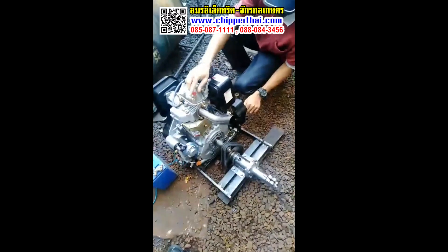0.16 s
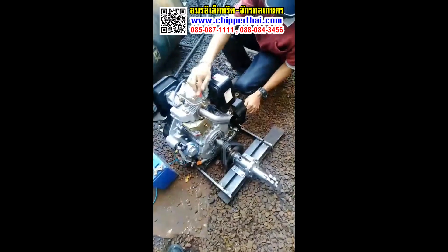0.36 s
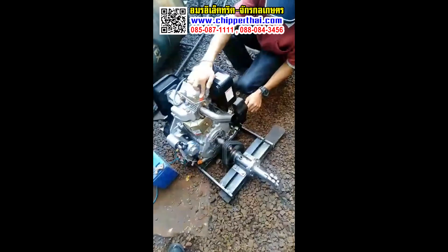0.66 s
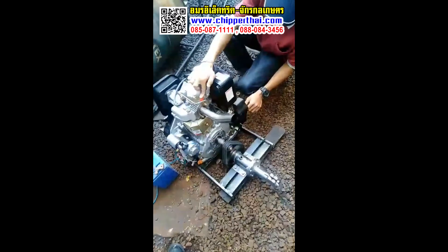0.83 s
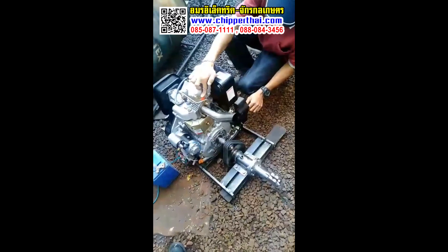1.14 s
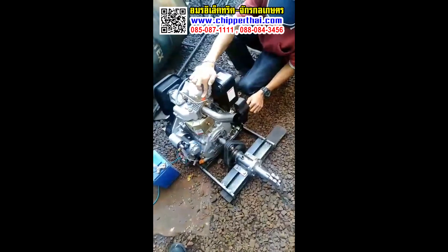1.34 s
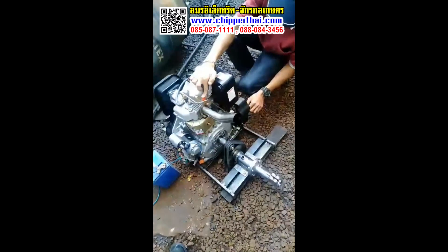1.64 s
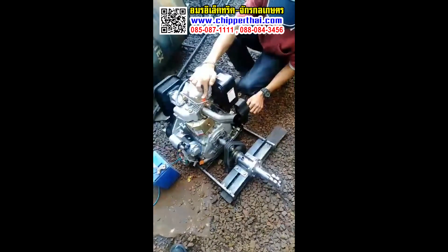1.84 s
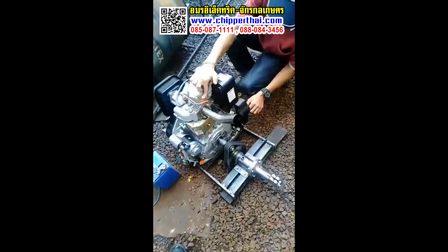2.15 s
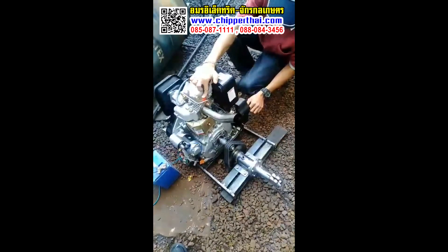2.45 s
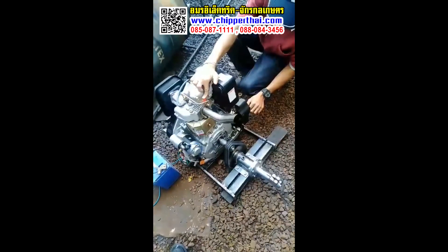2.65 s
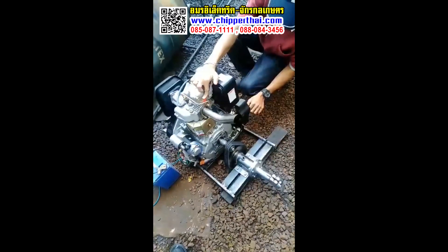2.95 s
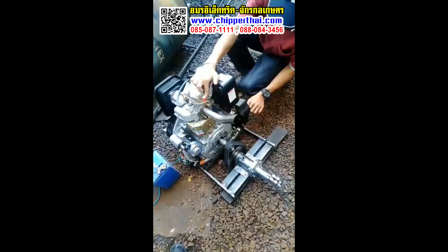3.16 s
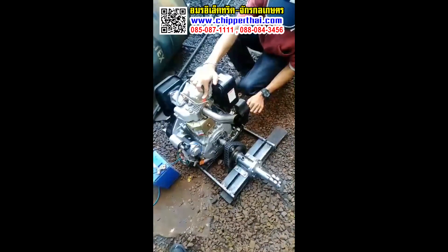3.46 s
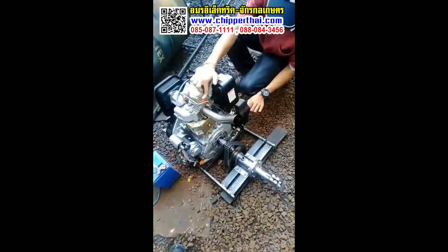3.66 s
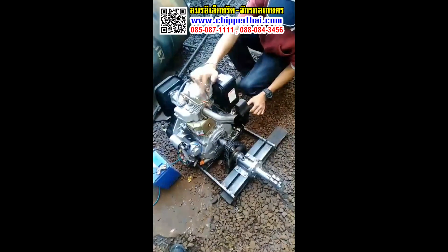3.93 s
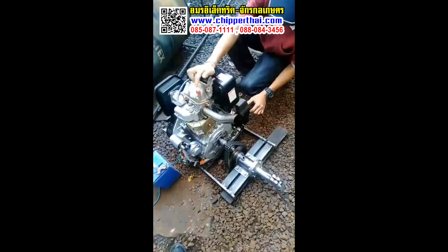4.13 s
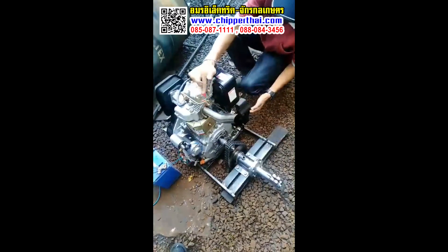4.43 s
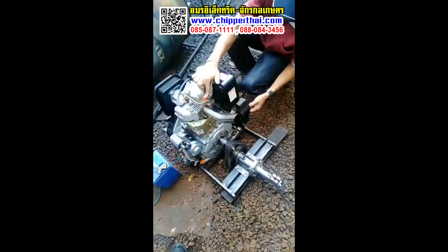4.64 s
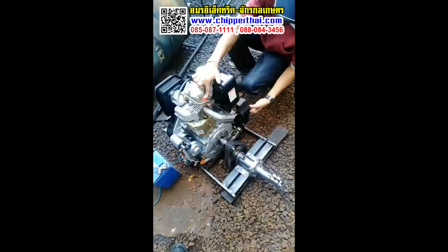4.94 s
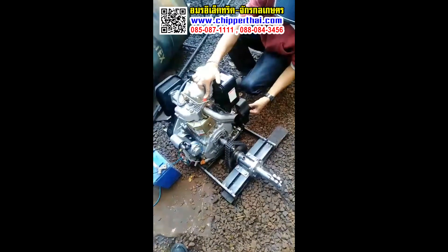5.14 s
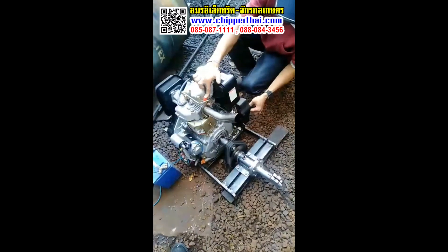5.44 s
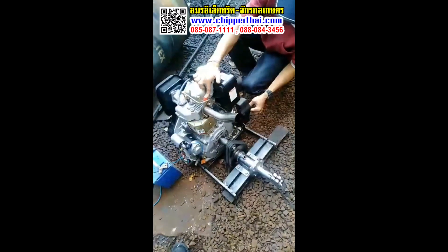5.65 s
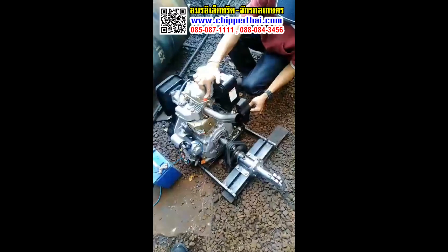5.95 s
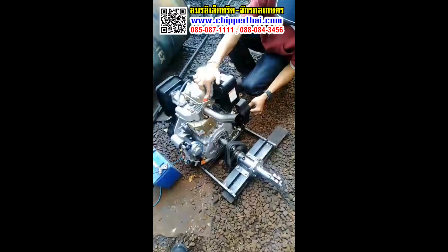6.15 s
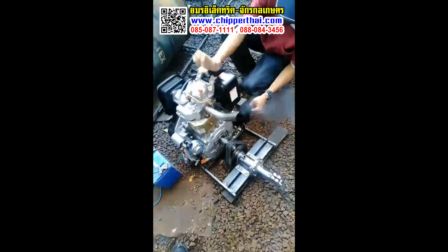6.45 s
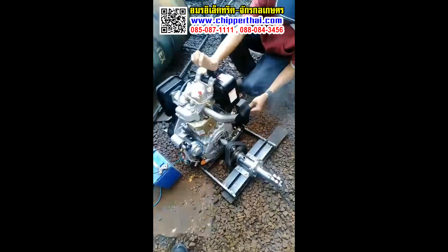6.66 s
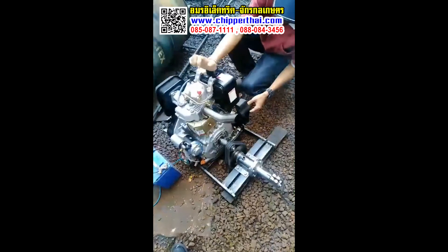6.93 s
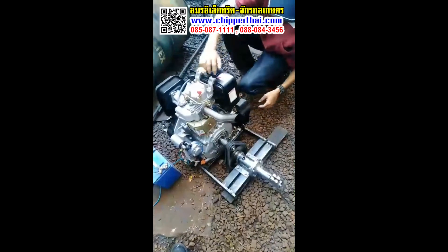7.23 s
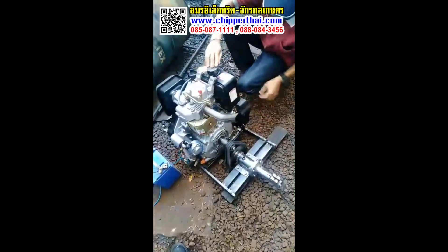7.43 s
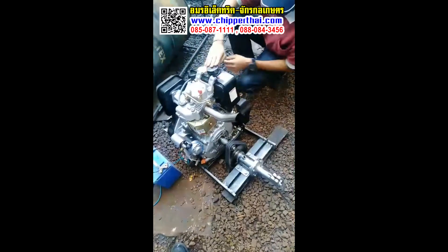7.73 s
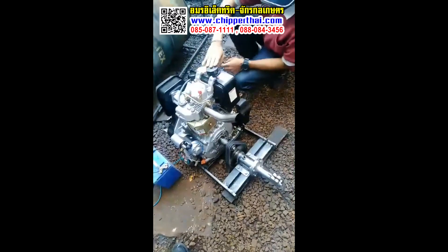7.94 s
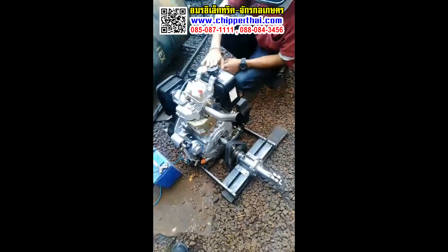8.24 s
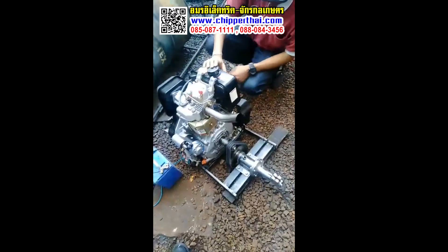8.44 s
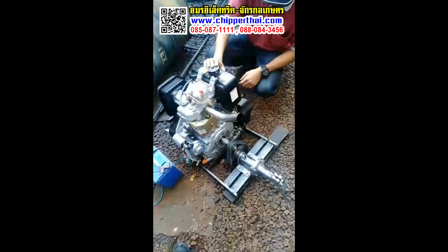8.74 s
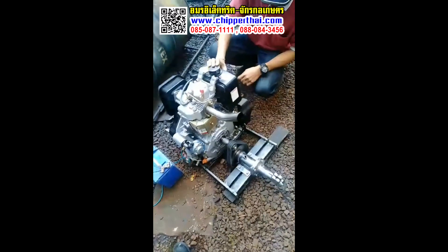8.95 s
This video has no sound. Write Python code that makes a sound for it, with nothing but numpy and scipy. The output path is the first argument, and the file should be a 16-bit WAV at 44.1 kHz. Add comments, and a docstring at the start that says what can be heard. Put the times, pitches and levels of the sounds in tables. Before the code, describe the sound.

Outdoors, close to a small single-cylinder diesel: quick knocking chugs for an instant, then a clack and firing stops. Air hisses on each turn, slowing and weakening with rattling metal, ending in a sigh and thin whistle. Quiet low rumble with faint squeaks and ticks. Then a starter slams and grinds harshly, the flywheel rings, and the engine coughs, catches and idles steadily.

```python
"""A small single-cylinder diesel idles outdoors, then hisses on each compression and clacks to a halt.
After a rest the starter grinds, the flywheel rings, and the engine coughs, catches and idles again.
A held decompression lever lets the compressions hiss away; the starter cranks until it is let go.
Crank angle times the gas pulses, knocks, clacks and air jets: pulses, shaped noise, damped resonances.
Gear mesh sets the starter's whine and grit; levels in dB are relative, before each layer's mix gain."""
import sys
import numpy as np
from scipy import signal
from scipy.fft import rfft, irfft, next_fast_len
from scipy.io import wavfile
from scipy.ndimage import uniform_filter1d

SR = 44100
rng = np.random.default_rng(int(sys.argv[2]) if len(sys.argv) > 2 else 0)


def unload_audio(sound):
    """Save the sound as a 16-bit wav file, at the path given as the first command line argument."""
    columns = np.transpose(np.atleast_2d(sound))
    # keep every value between -1 and 1, then stretch to whole-number steps
    steps = np.round(np.clip(columns, -1, 1) * 32767)
    wavfile.write(sys.argv[1], SR, steps.astype(np.int16))


N = 400869
TIME = np.arange(N) / SR

# Crank speed coasting to a halt: (time [s], speed [four-stroke cycles/s])
RUN_DOWN = [(0.0, 7.006), (0.485, 6.749), (0.793, 5.66), (1.151, 4.594), (1.434, 3.829), (2.022, 2.749),
            (2.443, 1.959), (2.705, 1.772), (3.2, 0.0)]
# Crank speed from rest up to idle: (time [s], speed [four-stroke cycles/s])
RESTART = [(5.36, 0.0), (5.502, 1.922), (6.617, 6.546), (7.0, 6.732), (7.53, 7.184), (9.09, 7.366)]
# Gear-mesh partials: (multiple, whine level [dB], flywheel level when the partial meets it [dB])
MESH_PARTIALS = [(1, -42, -20), (2, -33, -20)]
# Spectrum of bright metallic ticks: (frequency [Hz], level [dB])
TICK_COLOUR = [(1000, -10), (3000, 2.5), (6000, 2.5), (8000, -1.5), (12000, 0), (14500, -7)]

# Shares are fractions of a cycle after the top of the exhaust stroke
FIRING_SHARE = -.457
IDLE_SPEED = 7  # cycles/s
STARTER_ON_S, STARTER_OFF_S, CATCH_S = 5.347, 6.575, 6.43


def undb(db):
    """Decibels to gain."""
    return 10 ** (np.asarray(db) / 20)


def unit(x):
    """Scale to rms 1."""
    return x / np.sqrt(np.mean(x ** 2))


def over_hz(points, f):
    """Join points on a log-frequency axis."""
    hz, value = np.transpose(points)
    return np.interp(np.log(f + 1), np.log(hz), value)


def colour(x, points):
    """Filter a sound by a gain curve over frequency."""
    f = np.fft.rfftfreq(x.shape[-1], 1 / SR)
    return irfft(rfft(x) * undb(over_hz(points, f)), x.shape[-1])


def resonate(x, modes):
    """Sum of damped resonances: (frequency [Hz], width [Hz], level [dB])."""
    size = next_fast_len(x.shape[-1] + SR // 2)
    f = np.fft.rfftfreq(size, 1 / SR)
    response = sum(undb(db) * 1j * f * width / (hz ** 2 - f ** 2 + 1j * f * width)
                   for hz, width, db in modes)
    return irfft(rfft(x, size) * response, size)[..., :x.shape[-1]]


def noise(points, size=N):
    """Coloured stereo noise: channels alike in the bass, unrelated in the treble."""
    # Likeness of left and right: (frequency [Hz], correlation)
    likeness = [(30, .8), (130, .95), (300, .88), (640, .75), (1400, .55), (3100, 0.11), (15000, 0)]
    long = next_fast_len(size)
    f = np.fft.rfftfreq(long, 1 / SR)
    alike = np.clip(over_hz(likeness, f), -1, 1)
    random_phase = np.exp(2j * np.pi * rng.random((2, len(f))))
    mid, side = random_phase * np.sqrt([1 + alike, 1 - alike])
    spectrum = np.array([mid + side, mid - side]) * undb(over_hz(points, f))
    return unit(irfft(spectrum, long)[:, :size])


def clicks(times, sizes):
    """Impulses at the given times; those outside the scene are dropped."""
    at = (np.asarray(times) * SR).astype(int)
    inside = (at >= 0) & (at < N)
    return np.bincount(at[inside], np.broadcast_to(sizes, at.shape)[inside], N)


def spread(x, response):
    """Each impulse sets off the response."""
    return signal.oaconvolve(np.atleast_2d(x), np.atleast_2d(response), axes=1)[:, :N]


def fade(rise_s, fall_s, tail_s, tail_db):
    """Envelope of a blow: quick rise, main decay and a weaker tail."""
    t = TIME[:SR // 3]
    return (1 - np.exp(-t / rise_s)) * (np.exp(-t / fall_s) + undb(tail_db) * np.exp(-t / tail_s))


def swell(s, db, rise_s, fall_s):
    """Power of a sound with a Gaussian rise to its peak and an exponential fall."""
    t = TIME - s
    decay = np.where(t < 0, (t / rise_s) ** 2, t / fall_s)
    return (undb(db) * np.exp(-decay)) ** 2


def shimmer(x, depth_db, width_hz, hold_s, size=1024):
    """Narrow frequency bands swell and fade, each on its own."""
    _, _, z = signal.stft(x, nperseg=size)
    walk = rng.standard_normal(z.shape[1:])
    for axis, span in enumerate((width_hz * size / SR, hold_s * 2 * SR / size)):
        bell = np.exp(-(np.arange(-24, 25) / span) ** 2)
        walk = signal.fftconvolve(walk, np.expand_dims(bell, 1 - axis), "same")
    gain = unit(undb(depth_db * np.clip(unit(walk), -2, 2)))
    return signal.istft(z * gain, nperseg=size)[1][:, :N]


def speed(s, runs=(RUN_DOWN, RESTART)):
    """Crank speed in cycles per second at the given times."""
    return sum(np.maximum(np.interp(s, *np.transpose(run)), 0) for run in runs) + 1e-6


def angles():
    """Crank angle in cycles for the run-down and the restart: each integrates its speed."""
    starts = ((RUN_DOWN, .277), (RESTART, .011))  # start as a share of the cycle
    return [start + np.cumsum(speed(TIME, [run])) / SR for run, start in starts]


def crank(shares, count=24):
    """Times at which the crank passes the shares; one row a cycle, -1 where it never does."""
    places = np.arange(count)[:, None] + np.atleast_1d(shares)
    return np.vstack([np.interp(places, angle, TIME, left=-1, right=-1) for angle in angles()])


def knee_db(s, knee, power):
    """Level that is steady at high crank speed and falls away below the knee (cycles/s)."""
    return -10 * np.log10(1 + (knee / speed(s)) ** (2 * power))


def cranking_db(s):
    """Drop in level while the starter drags the engine, lifted over 0.1 s as it catches."""
    return -9.5 * (s > STARTER_ON_S) * np.clip(10 * (CATCH_S - s) + .5, 0, 1)


def gas_level(s):
    """Strength of the gas pulses in dB; it follows the crank speed."""
    return 0.3 + knee_db(s, knee=4.9, power=4) + cranking_db(s)


def burning(s):
    """Whether the fuel ignites at the given times."""
    # Stretches of ignition: (start [s], end [s])
    stretches = [(0, .42), (6.66, 9.2)]
    return np.any([(s >= start) & (s < end) for start, end in stretches], axis=0)


def block(x, modes_db):
    """The crankcase adds its resonances to whatever shakes it."""
    # Engine block resonances: (frequency [Hz], width [Hz], level [dB])
    block_modes = [(548, 41, 7), (649, 68, 4.5), (1000, 150, 12), (1360, 94, 7), (1620, 220, -4),
                   (2435, 79, 7), (3090, 160, 8), (3860, 200, 11), (5640, 380, 10)]
    return x + undb(modes_db) * resonate(x, block_modes)


def yard():
    """A low outdoor rumble: coloured noise with a slow random level."""
    # Rumble spectrum: (frequency [Hz], level [dB])
    rumble_colour = [(20, -62), (54, -3), (117, -3.5), (149, -0.5), (234, -7), (290, -2), (450, -9.5),
                     (644, -14.5), (1450, -14.5), (2700, -17.5), (5000, -19), (8000, -24), (9800, -31),
                     (14500, -40)]
    throb = uniform_filter1d(uniform_filter1d(rng.standard_normal(N), SR // 30), SR // 30)
    return noise(rumble_colour) * undb(-34.5 + 0.58 * unit(throb))


def squeaks(width_hz=22):
    """Thin, unsteady tones: noise through one narrow resonance, under a Gaussian swell."""
    # Faint squeaks around the rest: (time [s], pitch [Hz], half length [s], level [dB])
    squeak_table = [(3.18, 1410, .06, -41), (3.23, 2850, .05, -40.5), (3.9, 2730, .05, -40),
                    (3.89, 2960, .07, -44), (4.821, 1445, 0.13, -44), (5.1, 1440, 0.043, -40)]
    rub = noise([(100, 0), (10000, 0)], size=SR // 2)
    t = TIME[:SR // 2] - .5 / 2
    out = 0
    for s, hz, half_s, db in squeak_table:
        tone = unit(resonate(rub, [(hz, width_hz, 0)])) * np.exp(-(t / half_s) ** 2 / 2)
        out = out + spread(clicks([s - .5 / 2], undb(db)), tone)
    return out


def flywheel(teeth, mesh_hz, engaged):
    """Two mode pairs ring as the pinion catches; the low pair also when a mesh partial meets it."""
    # Low mode pair: (frequency [Hz], width [Hz], level [dB])
    ring_low = [(1037, 10, 6), (1076, 14, 3)]
    # High mode pair: (frequency [Hz], width [Hz], level [dB])
    ring_high = [(2774, 10, 1), (2842, 9, 0)]
    # Pinion catches, the last and longest as it is thrown out:
    # (peak time [s], low pair level [dB], high pair level [dB], rise [s], fall of the low pair [s])
    catches = [(5.39, -22, -20, .03, .03), (5.96, -30, -14, .015, .02), (6.21, -25, -16, .02, .025),
               (6.372, -11, -35, .035, .022), (6.7, -17.5, -15, .19, .32)]
    sympathy_hz = 50  # detuning that halves the response power
    centre_hz = np.mean(ring_low, axis=0)[0]
    low_power = 0
    for k, _, db in MESH_PARTIALS:
        detuning = (k * mesh_hz - centre_hz) / sympathy_hz
        low_power = low_power + (engaged * undb(db)) ** 2 / (1 + detuning ** 2)
    high_power = 0
    for s, low_db, high_db, rise_s, fall_s in catches:
        low_power = low_power + swell(s, low_db, rise_s, fall_s)
        high_power = high_power + swell(s, high_db, rise_s, .55 * fall_s)  # dies sooner
    # the low pair rings almost cleanly, wandering a little in phase
    drift = np.cumsum(rng.standard_normal((len(ring_low), N)), axis=1)
    low = 0
    for (hz, width, db), d in zip(ring_low, drift):
        wander = np.sqrt(2 * np.pi * width / SR) * d
        low = low + undb(db) * np.sin(2 * np.pi * hz * TIME + wander)
    high = resonate(teeth, ring_high)
    return undb(-1.0) * unit(low) * np.sqrt(low_power) + undb(-4) * unit(high) * np.sqrt(high_power)


def starter():
    """The pinion slams in and grinds on the ring gear: mesh-modulated noise, whine and flywheel ring."""
    # Gear mesh gathering speed: (time [s], mesh rate [Hz])
    mesh_track = [(5.4, 420), (5.56, 530), (5.8, 830), (5.99, 900), (6.12, 1025), (6.38, 1062), (6.5, 1140)]
    # Grinding spectrum: (frequency [Hz], level [dB])
    drive_colour = [(120, -40), (200, -22), (440, -18.5), (795, -17), (1040, -10), (1160, -11.5),
                    (3400, -6.5), (3710, -9.5), (5310, -0.5), (8170, -7), (11500, -8), (13700, -11),
                    (14500, -31)]
    # Starter drive resonances: (frequency [Hz], width [Hz], level [dB])
    drive_modes = [(3120, 34, -12), (3500, 39, 0.5), (3980, 32, -2), (4980, 84, -7), (5600, 25, -7),
                   (5900, 77, -23), (6380, 100, -11), (6830, 28, -8), (6900, 57, -16), (8130, 50, -16),
                   (8540, 77, -17), (8940, 69, -11), (9150, 54, -11), (10840, 88, -9.5)]
    attack_s, fall_db_per_s = .011, 115
    engaged = np.clip((TIME - STARTER_ON_S) / attack_s, 0, 1)
    engaged = engaged * undb(-fall_db_per_s * np.maximum(TIME - STARTER_OFF_S, 0))
    mesh_hz = np.interp(TIME, *np.transpose(mesh_track))
    mesh = 2 * np.pi * np.cumsum(mesh_hz) / SR
    roughness = unit(uniform_filter1d(rng.standard_normal(N), SR // 300))
    grit = undb(1.5 * np.sin(mesh) + 0.92 * roughness)
    teeth = grit * noise(drive_colour)
    grind = unit(teeth) + undb(-12) * unit(resonate(teeth, drive_modes))
    grind = undb(-10.7) * unit(shimmer(grind, depth_db=5, width_hz=40, hold_s=.07))
    whine = grit * sum(undb(db) * np.sin(k * mesh) for k, db, _ in MESH_PARTIALS)
    slam = spread(clicks([5.362], 0.94), fade(rise_s=0.028, fall_s=0.038, tail_s=0.068, tail_db=-20))
    slam = slam * noise([(60, -33), (200, 4), (500, -1.5), (1600, -1.5), (3000, -7), (9000, -38)])
    ring = flywheel(teeth, mesh_hz, engaged)
    return engaged * (undb(1) * grind + whine) + undb(-3) * slam + ring


def decompression():
    """Air jets past the lifted valve, weaker and shorter as the crank slows; the last sighs and whistles."""
    # Slow escapes as the piston stalls and rocks back: (peak time [s], level [dB], rise [s], fall [s])
    sighs = [(2.45, -27.5, .06, .09), (2.57, -30, .05, .04), (3.3, -32, .071, .085), (3.6, -37, .04, .04)]
    # Escaping air spectrum: (frequency [Hz], level [dB])
    leak_colour = [(500, -23), (1200, -3), (1900, 2.5), (2300, 5), (2600, 0), (3000, 7.5), (3500, 0.5),
                   (3900, 1), (4500, -5.5), (5200, -1.5), (6200, 6.5), (6900, 0.5), (11500, -1),
                   (14500, -4)]
    jet_share, jet_lag_s, jet_rise_s = .41, .014, .018
    jet_idle_fall_s = .072  # fall time at idle speed, proportional to speed
    draw_share, draw_s = .65, .045
    slow = sum(swell(*sigh) for sigh in sighs)
    # air seeps out of the resting cylinder
    power = slow + swell(3.2, -44, rise_s=.5, fall_s=.6)
    for jet_s, draw_at_s in crank([jet_share, draw_share]):
        if .42 < jet_s < 2.3:
            jet_db = -9.5 + knee_db(jet_s, knee=3.6, power=2.8)
            jet_fall_s = jet_idle_fall_s * speed(jet_s) / IDLE_SPEED
            power = power + swell(jet_s + jet_lag_s, jet_db, jet_rise_s, jet_fall_s)
            # the sinking piston draws air back through the same gap
            power = power + swell(draw_at_s, -29, draw_s, draw_s)
    # one whistling swell, whose pitch follows the pressure
    whistle_s, whistle_half_s, base_hz, rise_hz = 3.318, .06, 10500, 3400
    pressure = np.exp(-((TIME - whistle_s) / whistle_half_s) ** 2)
    waver = unit(uniform_filter1d(rng.standard_normal(N), SR // 1000))
    whistle_hz = (base_hz + rise_hz * pressure) * (1 + .014 * waver)
    whistle = np.sin(2 * np.pi * np.cumsum(whistle_hz) / SR) * pressure
    whistle = whistle * undb(-24) * undb([[-7], [3]])  # stronger on the right
    # a thin, high hiss rides on the jet, more so on the slow escapes
    thin = np.sqrt(undb(-12) ** 2 * power + undb(-4.5) ** 2 * slow)
    thin = thin * noise([(5000, -23), (8000, -5), (11500, 0), (14500, -4)])
    return np.sqrt(power) * noise(leak_colour) * undb(2.5) + thin + whistle


def valve_gear(count=48):
    """Gear teeth rattle in a partly repeating pattern over bearing hiss; valve gear ticks; louder with speed."""
    # Clatter spectrum: (frequency [Hz], level [dB])
    clatter_colour = [(60, -23), (170, -1), (320, 1.5), (410, -9), (520, -1), (650, -4), (780, -10),
                      (1100, -8), (2400, -10), (4300, -20), (6000, -17), (8000, -19), (11500, -19.5),
                      (14500, -24)]
    # Valve-gear ticks: (share of the cycle, level [dB])
    gear_ticks = [(-.28, -6), (-.18, -7.5), (0.078, -3), (.38, -7)]
    s = crank(np.arange(count) / count)
    # one part repeats every cycle, one is new
    tooth_db = 3.8 * rng.standard_normal(count) + 3 * rng.standard_normal(s.shape)
    ring = fade(rise_s=0.0009, fall_s=0.0073, tail_s=0.0083, tail_db=-24)
    ring = ring * noise(clatter_colour, size=len(ring))
    tooth_s = s + .00015 * rng.standard_normal(s.shape)
    teeth = unit(spread(clicks(tooth_s, undb(tooth_db)), ring))
    rattle = unit(block(teeth + undb(7) * noise(clatter_colour), modes_db=-15))
    shares, tick_db = np.transpose(gear_ticks)
    s = crank(shares)
    ticks = clicks(s, undb(tick_db + 0.95 * rng.standard_normal(s.shape)))
    ticks = spread(ticks, fade(rise_s=0.0007, fall_s=0.0077, tail_s=0.048, tail_db=-15))
    ticks = ticks * noise(TICK_COLOUR)
    # 23 dB per decade of crank speed
    level_db = -17.5 + 23 * np.log10(speed(TIME) / IDLE_SPEED) + cranking_db(TIME)
    return undb(level_db) * (undb(-1.0) * rattle + undb(2) * ticks)


def clacks():
    """Metal clacks, from rockers in every cycle and a few alone: a ringing body and a bright tick."""
    # Rockers and cam followers: (share of the cycle, body level [dB], treble level [dB])
    rockers = [(-.218, -23.5, -35), (-.04, -31.5, -47), (.057, -24.5, -28.5), (.244, -29, -48)]
    # Lone clacks of lever, piston and starter pinion: (time [s], body level [dB], treble level [dB])
    lone_clacks = [(0.403, -26, -18), (2.466, -24.5, -18), (2.996, -34, -34), (3.554, -28.5, -41),
                   (3.583, -32, -24), (4.029, -38, -38), (5.954, -21.5, -17), (6.913, -30, -13)]
    rows = list(lone_clacks)
    for share, body_db, treble_db in rockers:
        for s in crank(share).ravel():
            rows.append((s, body_db + cranking_db(s), treble_db + cranking_db(s)))
    s, body_db, treble_db = np.transpose(rows)
    body = spread(clicks(s, undb(body_db)), fade(rise_s=0.0012, fall_s=0.009, tail_s=.04, tail_db=-16))
    body = body * noise([(250, -28), (700, -1.5), (1200, 1.5), (1900, 4), (2500, 3.5),
                         (4000, -12.5), (7000, -24), (14000, -34)])
    tick_fade = fade(rise_s=0.0011, fall_s=0.0032, tail_s=0.011, tail_db=-6)
    tick = spread(clicks(s, undb(treble_db)), tick_fade) * noise(TICK_COLOUR)
    return block(undb(.5) * body, modes_db=-2.5) + undb(5.5) * tick


def knocks():
    """Ignition snaps, the block rings on, and the piston slaps the liner a moment later, lower in pitch."""
    # Knock body spectrum: (frequency [Hz], level [dB])
    knock_colour = [(200, -20), (450, 6), (750, -12), (1300, 1.5), (1900, -5.5), (2600, -2.5), (4000, -14),
                    (7000, -7.5), (14000, -42)]
    body_db, treble_db, scatter_db = -11.8, -16, .9
    s = crank(FIRING_SHARE)
    s = s[burning(s)]
    force = undb(scatter_db * rng.standard_normal(len(s)))
    size = force * undb(body_db)
    snap = spread(clicks(s, size), fade(rise_s=0.0006, fall_s=0.003, tail_s=.015, tail_db=-22))
    snap = snap * noise([(900, -17), (1500, 5.5), (2700, -2.5), (4000, -5.5), (7000, -9), (14000, -37)])
    body_fade = fade(rise_s=0.0019, fall_s=0.013, tail_s=0.027, tail_db=-24.5)
    body = spread(clicks(s + 0.0025, size), body_fade) * noise(knock_colour)
    crack_fade = fade(rise_s=0.0088, fall_s=0.03, tail_s=.045, tail_db=-4.5)
    crack = spread(clicks(s, force * undb(treble_db)), crack_fade) * noise(TICK_COLOUR)
    slap_fade = fade(rise_s=0.0027, fall_s=0.034, tail_s=0.1, tail_db=-20)
    slap = spread(clicks(s + 0.013, size), slap_fade)
    slap = slap * noise([(20, -8), (90, 6), (200, 18), (480, -2.5), (650, 6.5), (1100, -20), (3000, -39)])
    ring = block(undb(-2.5) * body + undb(-6) * slap, modes_db=2)
    return undb(5) * snap + ring + undb(-1.5) * crack


def cough():
    """A rough gust of gas from the silencer as the engine catches: a swell of low noise."""
    gust = np.sqrt(swell(6.49, -14, rise_s=.02, fall_s=.05))
    return gust * noise([(25, -20), (70, -4), (200, -2), (360, 3), (520, -11), (1200, -30), (6000, -55)])


def puff(times, db, hz):
    """Short pressure pulses around a pitch, no two quite as strong."""
    turn = (np.pi * hz * (TIME[:SR // 10] - 1 / 20)) ** 2
    size = undb(db + .7 * rng.standard_normal(times.shape))
    return spread(clicks(times - 1 / 20, size), (1 - 2 * turn) * np.exp(-turn))


def boom():
    """The cylinder booms through the open exhaust valve, higher as the piston shrinks its volume."""
    # Boom over the cycle: (share of the cycle, pitch [Hz], level [dB])
    boom_track = [(-.36, 90, -41), (-.22, 106, -17), (-.12, 105.6, -16), (-.05, 145, -7.5), (0, 180, -6),
                  (.04, 233, -10), (.09, 310, -19.5), (.2, 340, -32)]
    shares, hz, db = np.transpose(boom_track)
    out = 0
    for angle in angles():
        cycle = np.round(angle)
        share = angle - cycle
        top_s = np.interp(cycle, angle, TIME)
        turns = np.cumsum(np.interp(share, shares, hz)) / SR
        turns = turns - np.interp(top_s, TIME, turns)  # phase zero at the top
        moving = np.gradient(angle) * SR > 1
        gain = undb(np.interp(share, shares, db, left=-120, right=-120))
        out = out + moving * np.cos(2 * np.pi * turns) * gain
    return out * undb(gas_level(TIME))


def exhaust():
    """Gas pulses ring silencer and intake; each firing adds a stronger blow-down; the gas flutters."""
    # Compression, valve overlap and intake pulses: (share of the cycle, pitch [Hz], level [dB])
    strokes = [(-.49, 150, -10.5), (.12, 170, -10.5), (.22, 153, -7.5), (0.349, 160, -13)]
    # Air resonances of silencer and intake: (frequency [Hz], width [Hz], level [dB])
    pipes = [(67, 11, 3), (114, 22.3, 10), (142, 5.7, -1), (179.4, 36, 9.5), (264, 14, -8), (337, 35, 9)]
    pulses = 0
    for share, hz, db in strokes:
        s = crank(share)
        pulses = pulses + puff(s, gas_level(s) + db, hz)
    s = crank(-.128)[burning(crank(FIRING_SHARE))]
    # the blow-down comes back once from the far end of the silencer
    blow = puff(s, gas_level(s) - 7.5, hz=113) + puff(s + .009, gas_level(s) - 8.5, hz=130)
    cylinder = boom()
    flow = np.sqrt(np.abs(uniform_filter1d((pulses + cylinder) ** 2, SR // 50)))
    flutter = flow * noise([(20, -24), (55, -13), (130, -6), (310, 5), (600, -9), (1500, -26), (8000, -53)])
    direct = undb(-16.5) * pulses + undb(-5) * blow + cylinder
    ringing = resonate(pulses + undb(-2.5) * blow + undb(-7.5) * cylinder, pipes)
    gas = direct + undb(-4.5) * ringing
    # the exhaust sound carries little deep bass
    return colour(gas, [(25, -23), (58, 0)]) + undb(-17.5) * flutter


def scene():
    """Surroundings, starter and engine summed."""
    air = shimmer(decompression(), depth_db=5, width_hz=70, hold_s=.08)
    metal = shimmer(valve_gear(), depth_db=4, width_hz=41, hold_s=0.034)
    return yard() + squeaks() + starter() + air + metal + clacks() + knocks() + cough() + exhaust()


def record(dry):
    """The right side is nearer and has more high treble; peaks are rounded, both ends of the band cut."""
    # Left minus right: (frequency [Hz], level difference [dB])
    ports = [(110, 1), (550, 1.5), (1300, -.5), (4400, 0), (6000, 1.5), (8100, -1.5), (10000, -6.5),
             (12500, -13.5), (15000, -4)]
    sound = np.array([colour(x, [(hz, side * db / 2) for hz, db in ports])
                      for x, side in zip(dry, (1, -1))])
    sound = sound / (1 + sound ** 6) ** (1 / 6)
    sound = signal.sosfilt(signal.butter(1, 15, "high", fs=SR, output="sos"), sound)
    sound[0] = np.roll(sound[0], 3)  # left arrives 3 samples later
    return signal.sosfilt(signal.ellip(10, .2, 70, 14400, fs=SR, output="sos"), sound)


dry = scene()
out = record(dry)
unload_audio(out)
```